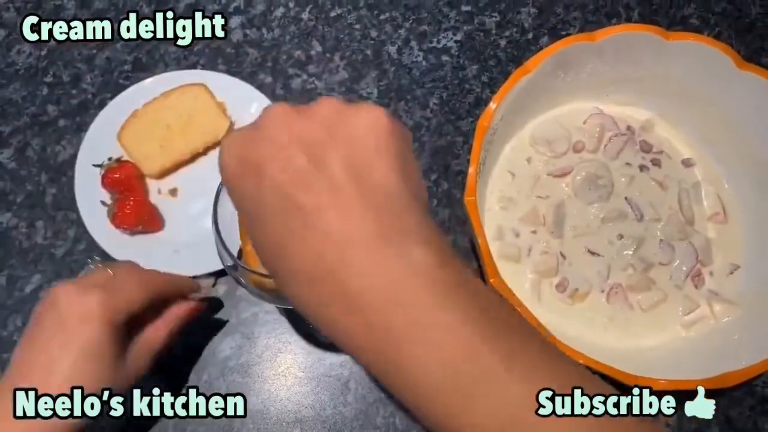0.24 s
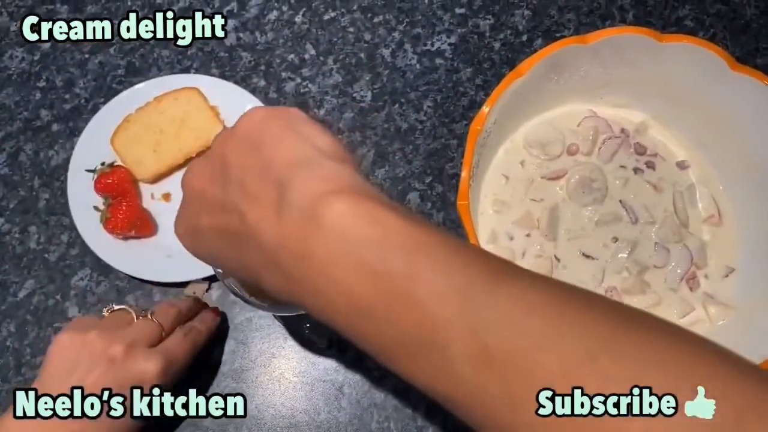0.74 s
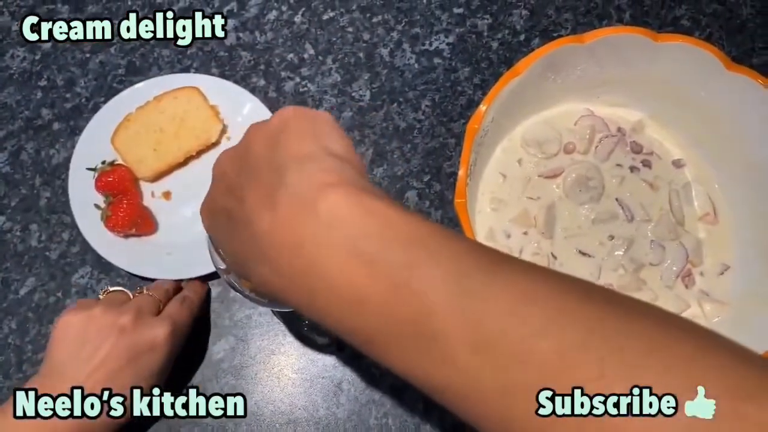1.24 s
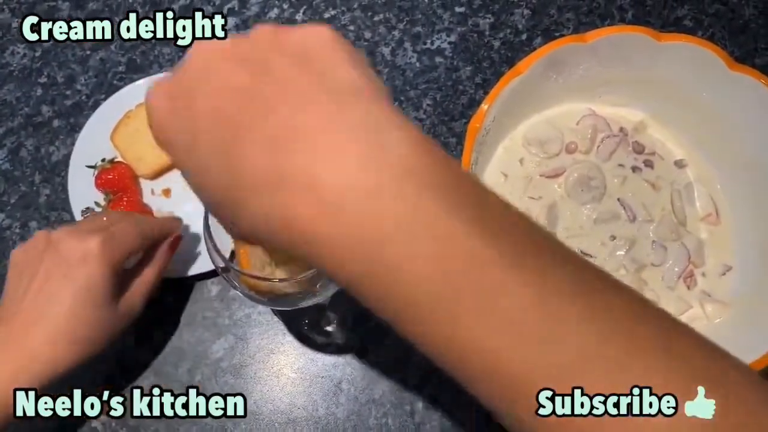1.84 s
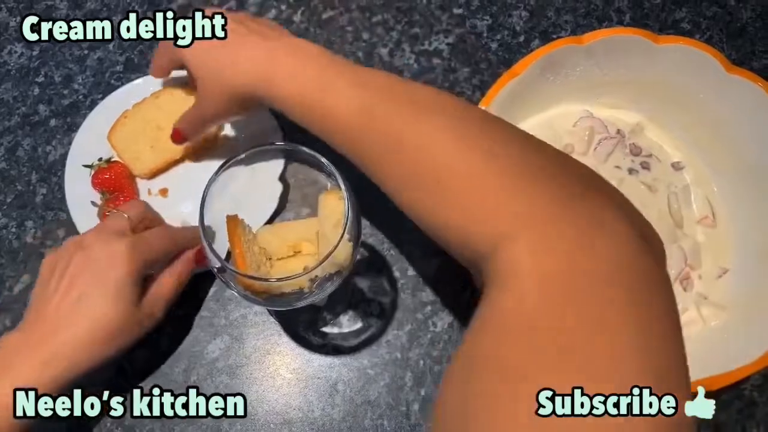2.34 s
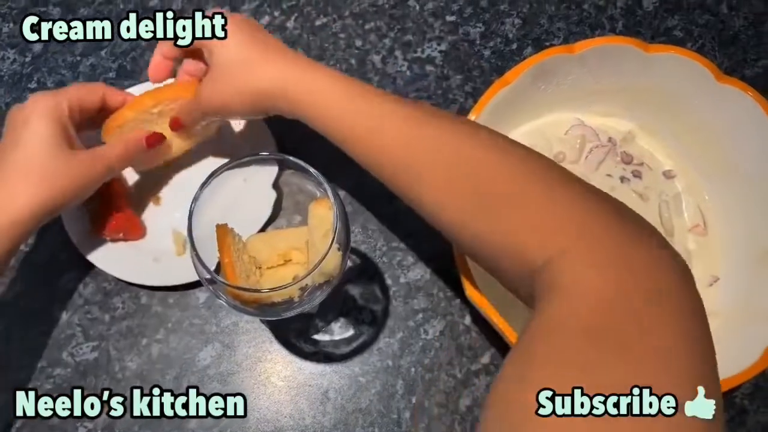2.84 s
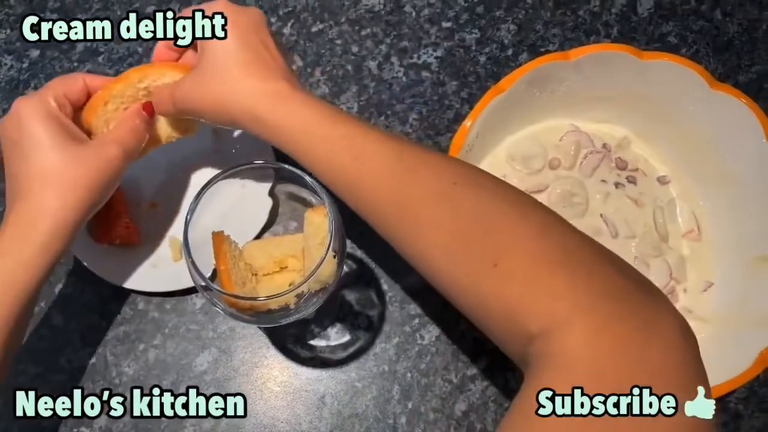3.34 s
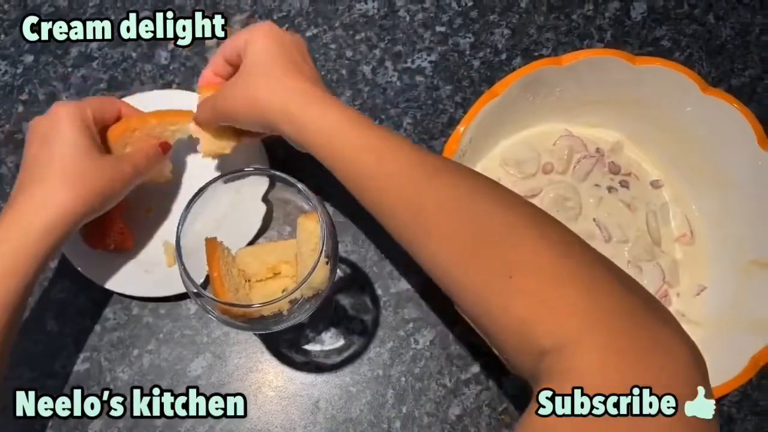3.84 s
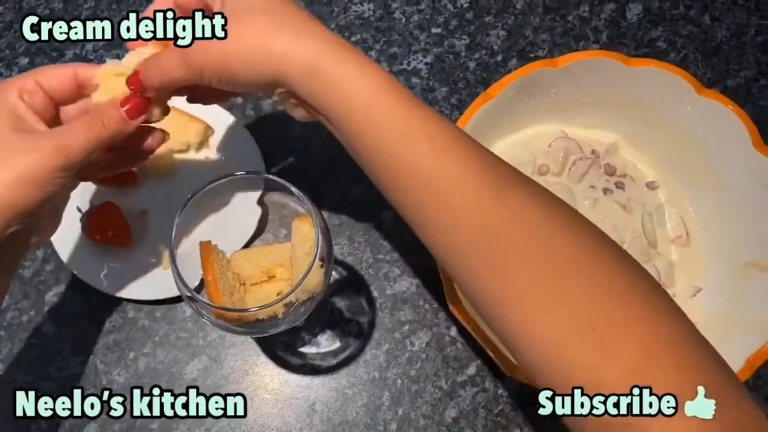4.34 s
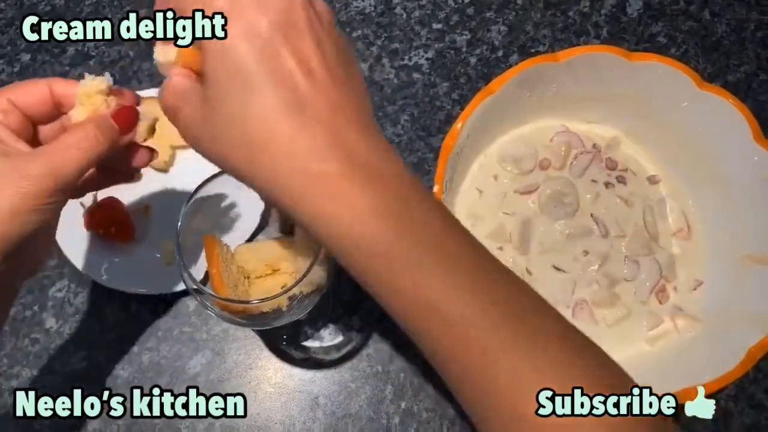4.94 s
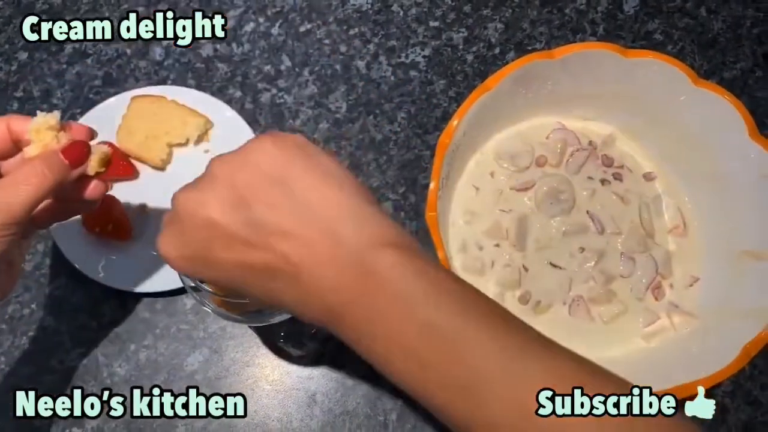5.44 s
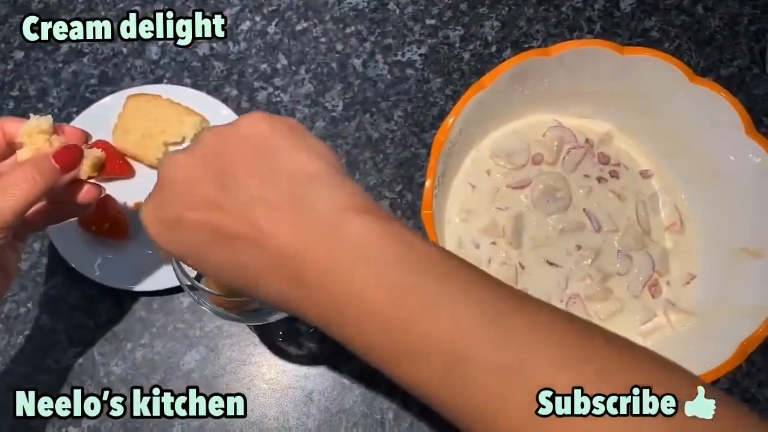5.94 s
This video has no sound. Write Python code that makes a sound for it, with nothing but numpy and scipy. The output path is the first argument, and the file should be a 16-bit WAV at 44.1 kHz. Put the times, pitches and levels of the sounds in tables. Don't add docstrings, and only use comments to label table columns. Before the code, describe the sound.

Quiet handling of a glass cup and plate in a small, lightly reverberant kitchen, miked closely. Low room noise swells and sinks throughout. Sparse clinks, crumb ticks and sleeve rustles lead to a woody knock, a pause of dry little ticks, then a strong combined knock and ringing clink. After that come a crisp glass tap, faint scratches and muffled low thumps.

```python
import sys
import numpy as np
from scipy import signal
from scipy.fft import rfft, irfft
from scipy.io import wavfile
from scipy.ndimage import uniform_filter1d

SR = 44100
rng = np.random.default_rng(int(sys.argv[2]) if len(sys.argv) > 2 else 0)


def gain_from_db(level_db):
    decades = np.asarray(level_db, float) / 20
    return 10 ** decades


def wrap_up_sound(samples):
    columns = np.atleast_2d(samples).T
    tamed = np.clip(columns, -1, 1)
    steps = np.round(tamed * 32767).astype(np.int16)
    wavfile.write(sys.argv[1], SR, steps)


N = 272532


def evened(x):
    return x / np.sqrt(np.mean(x ** 2) + 1e-20)


def read(points, hz):
    f, value = np.transpose(points)
    return np.interp(np.log(hz + 1), np.log(f + 1), value)


def add(mix, s, sound):
    part = mix[round(s * SR):][:len(sound)]
    part += sound[:len(part)]


def ring(hz, db, t60, rise=1e-4):
    t = np.arange(SR // 2) / SR
    decay = gain_from_db(db - 60 * t / t60)
    return decay * np.sin(2 * np.pi * hz * t) * (1 - np.exp(-t / rise))


def woken(modes, db, best_hz, loss_db, free=0.83, cycles=0.):
    total = 0
    for hz, mode_db, t60 in modes:
        off_db = abs(loss_db) * np.log2(hz / best_hz) ** 2
        total = total + ring(hz, db + mode_db - off_db, t60 * free, 1e-4 + cycles / hz)
    return total


def dish(modes, taps, slides):
    out = np.zeros(N)
    for s, *touch in taps:
        add(out, s, woken(modes, *touch, cycles=7))
    for s, length, *touch in slides:
        grit = rng.standard_normal(SR // 4)[:round(length * SR)] ** 3
        force = grit * np.hanning(len(grit)) ** .5 / np.linalg.norm(grit)
        add(out, s, signal.fftconvolve(force, woken(modes, *touch)))
    return out


def diffuse(frames, likeness, size):
    hz = np.fft.rfftfreq(size, 1 / SR)
    a, b, c, d = rng.standard_normal((frames, len(hz), 4)).T
    same = np.clip(read(likeness, hz), -1, 1)[:, None]
    first, other = a + 1j * b, c + 1j * d
    return hz[:, None], np.array([first, same * first + np.sqrt(1 - same ** 2) * other])


def air():
    # f/Hz, density/dB per Hz
    colour_points = [(20, -54), (36, -9), (63, -3.5), (120, -9), (301, -16.5), (439, -21.5), (624, -24),
                     (1370, -31), (1740, -33.5), (5430, -41), (7500, -44.5), (11000, -46.5), (14000, -47),
                     (16200, -59.5)]
    # t/s, swell/dB
    stir = [(0, 6.5), (.24, 1.5), (.5, 9.5), (.74, 5.5), (.88, 3.5), (1.3, 3.5), (1.95, -1.5), (2.4, 11),
            (2.6, 2.5), (2.72, 2.5), (3.2, -2.5), (3.5, 2), (3.85, 14), (4.12, 15.5), (4.25, -2.5),
            (4.65, 4), (4.95, -1.5), (5.7, 3)]
    # f/Hz, width/octaves, share of the swell
    stir_ranges = [(85, .7, 1.12), (350, 0.58, 0.82), (1120, 0.58, 0.25)]
    # f/Hz, width/Hz, level/dB
    hums = [(50.8, 7.6, -55), (108.8, 4, -66.5)]
    # f/Hz, likeness
    far_likeness = [(60, .998), (110, .95), (200, .78), (380, .3), (700, -.5), (1300, -.1), (3000, .1),
                    (5000, .6), (6300, .96), (15000, .96)]
    frames = N // 256 + 5
    hz, z = diffuse(frames, far_likeness, size=1024)
    s, stir_db = np.transpose(stir)
    stir_now = np.interp(np.arange(frames) * 256 / SR, s, stir_db)
    swell_db = 0
    for f, octaves, share in stir_ranges:
        swell_db = swell_db + np.exp(-(np.log2((hz + 1) / f) / octaves) ** 2) * share * stir_now
    patches = rng.standard_normal((frames, 513)).T
    patches = evened(uniform_filter1d(uniform_filter1d(patches, 6, 0), 10, 1))
    colour = gain_from_db(read(colour_points, hz))
    colour = colour * gain_from_db(-56) / np.sqrt(np.mean(colour[2:] ** 2))
    z = z * colour * gain_from_db(swell_db + 2.0 * patches)
    out = 17.4 * signal.istft(z, nperseg=1024, noverlap=768)[1][:, :N] / 513
    for f, width, db in hums:
        r = np.exp(-np.pi * width / SR)
        drive = rng.standard_normal((N + SR, 2)) @ [1, 1j]
        slow = signal.lfilter([1], np.convolve([1, -r], [1, -r]), drive)[SR:]
        carrier = np.exp(2j * np.pi * f * np.arange(N) / SR)
        out = out + gain_from_db(db) * evened((slow * carrier).real)
    return out


def glass():
    # f/Hz, level/dB, t60/s
    modes = [(1154, 0, .45), (2845, 0, .09), (2903, -5, .25), (5389, 0, .12), (5402, -16, .3),
             (8355, -5, .11), (8380, -20, .28), (11600, -22, .12), (12250, -18, .15)]
    # t/s, level/dB, best woken f/Hz, loss/dB per octave squared, share of free ring time
    taps = [
        (.001, -49, 5600, 11, 1.1),
        (.012, -62, 2900, 30, 1.7),
        (.03, -61, 1154, 30, .9),
        (.686, -67, 1154, 30, 1),
        (3.943, -48, 1154, 30, 1),
        (3.944, -51, 5400, 34, 1),
        (5.025, -45.5, 4800, 6, .55),
        (5.03, -52, 2900, 40, .5),
        (5.06, -54, 5400, 20, .9),
        (5.49, -69, 1154, 20, .25),
    ]
    # t/s, length/s, level/dB, best woken f/Hz, loss/dB per octave squared
    slides = [(.001, .03, -64, 1154, 30), (.59, .08, -71, 2900, 30), (.686, .04, -70, 5400, 21),
              (3.875, .04, -68, 6000, 12), (5.27, .1, -63, 5600, 16), (5.38, .09, -65, 6000, 12),
              (5.46, .07, -61, 3900, 5), (5.69, .04, -73, 6000, 12), (5.99, .05, -71, 6000, 12)]
    return dish(modes, taps, slides)


def kitchen(x, gap=0.0016):
    # f/Hz, t60/s
    band_t60 = [(60, 0.9), (200, 0.37), (500, 0.25), (1500, 0.45), (4000, 0.23), (10000, 0.066)]
    # f/Hz, likeness
    near_likeness = [(60, .999), (350, 0.97), (700, 0.45), (2500, 0.83), (5000, 0.54), (6300, 0.53),
                     (15000, 0.91)]
    hz, z = diffuse(320, near_likeness, size=256)
    t = np.arange(320) * 64 / SR
    tail = signal.istft(z * gain_from_db(-60 * t / read(band_t60, hz)), nperseg=256, noverlap=192)[1]
    tail = tail * (1 - np.exp(-(np.arange(tail.shape[1]) / SR / gap) ** 2))
    return signal.fftconvolve(x[None], tail / np.linalg.norm(tail[0]), axes=1)[:, :N]


def counter():
    # f/Hz, level/dB, t60/s
    modes = [(81, 3.5, 0.3), (106, -0.5, 0.24), (227, 1, 0.11), (271, 1, 0.058), (330, -0.5, 0.072),
             (446, 0, .3), (703, -0.5, 0.072), (1116, 5, 0.016), (2132, -12, 0.15), (2822, -7, 0.015)]
    # t/s, level/dB, best woken f/Hz, loss/dB per octave squared, time until muffled/s
    blows = [(.035, -39, 107, 30, .3), (.685, -53, 690, 30, .3), (.7486, -36, 950, 12, .3),
             (2.2791, -37, 73, 30, .3), (2.2805, -17, 880, 20, .008), (2.742, -51, 220, 30, .05),
             (3.884, -30, 200, 25, .025), (3.945, -23, 95, 40, .06), (3.945, -28, 270, 60, .03),
             (3.9415, -13.5, 446, 60, .027), (3.941, -15, 1120, 25, .3), (3.94, -28, 2600, 30, .3),
             (3.984, -25, 130, 25, .016), (5.026, -45, 220, 30, .3), (5.448, -37, 150, 8, .08),
             (5.449, -40, 300, 15, .02), (5.901, -25, 290, 80, .012), (5.916, -27, 130, 20, .012),
             (5.945, -35, 200, 40, .015)]
    # t/s, level/dB, top f/Hz, t60/s
    clatters = [(0.033, -49.5, 250, 0.18), (.685, -56, 540, 0.081), (.7486, -42, 1420, 0.13),
                (2.27, -32.5, 640, 0.26), (2.279, -42, 1700, 0.12), (2.742, -66.5, 1040, 0.15),
                (3.883, -57, 398, .054), (3.941, -24, 1102, 0.21), (2.269, -46.5, 1460, 0.13),
                (3.941, -33, 2250, .15), (5.028, -50.5, 1300, 0.038), (5.447, -43, 680, .15),
                (5.898, -55, 850, 0.069), (5.918, -46, 300, .1), (5.45, -42, 270, 0.31)]
    muffled_t60 = .02
    out, t = np.zeros(N), np.arange(SR // 2) / SR
    for s, db, top_hz, fade in clatters:
        band = signal.butter(3, [90, top_hz], "band", fs=SR, output="sos")
        clatter = evened(signal.sosfilt(band, rng.standard_normal(len(t))))
        add(out, s, gain_from_db(db - 60 * t / fade) * clatter * (1 - np.exp(-t / 0.0017)))
    for s, db, best_hz, loss_db, held in blows:
        muffle = gain_from_db(-60 * np.maximum(t - held, 0) / muffled_t60)
        add(out, s, muffle * woken(modes, db, best_hz, loss_db, cycles=1.6))
    return out


def skin():
    # t/s of firmest contact, level/dB, swell/s, fade/s
    strokes = [(.21, -86, .03, 0.037), (.35, -78, .07, 0.034), (1.94, -82, .06, 0.037),
               (2.081, -69.5, 0.12, 0.13), (2.17, -82, 0.088, 0.032), (2.38, -73.5, 0.076, 0.069),
               (2.57, -80.5, 0.058, 0.061), (3.0, -87, 0.066, 0.12), (3.13, -87, .05, 0.11),
               (3.705, -69, 0.019, 0.051), (3.78, -77, 0.023, 0.086), (3.884, -75, .008, .02),
               (3.939, -65.5, 0.012, 0.0422), (4.44, -87, .09, 0.14), (5.027, -61.5, 0.0072, 0.022),
               (5.065, -76, 0.0066, 0.05), (5.47, -81, 0.019, .04)]
    # f/Hz, density/dB per Hz
    colour = [(600, -7), (1500, -9.5), (4000, -1.5), (7500, -4), (11000, -3), (15000, 6.5), (16200, -64)]
    t, level = np.arange(N) / SR, np.zeros(N)
    for s, db, swell, fade in strokes:
        level += gain_from_db(db) * np.exp(-((t - s) / np.where(t < s, swell, fade)) ** 2)
    roughness = evened(uniform_filter1d(rng.standard_normal(N), 150))
    grains = rng.standard_normal(N) * gain_from_db(0.45 * roughness)
    hiss = irfft(rfft(grains) * gain_from_db(read(colour, np.fft.rfftfreq(N, 1 / SR))), N)
    return gain_from_db(7.5) * level * evened(hiss)


def sleeves():
    # t/s, level/dB, f/Hz, half length/s
    rustles = [(0.349, -62, 350, 0.065), (.48, -66, 452, 0.052), (0.856, -61.5, 330, 0.074),
               (0.998, -74.5, 1160, 0.12), (1.252, -64.5, 350, 0.032), (1.769, -71, 930, 0.046),
               (2.779, -72, 1120, 0.034), (3.15, -79.5, 1350, 0.033), (3.519, -66, 350, 0.11),
               (4.549, -74, 1080, 0.076), (4.768, -75, 1830, 0.046), (5.7, -55, 122.5, 0.079)]
    out, t = np.zeros(N), np.arange(-SR // 4, SR // 4) / SR
    for s, db, hz, half in rustles:
        band = signal.butter(2, [hz / 1.3, hz * 1.3], "band", fs=SR, output="sos")
        rustle = evened(signal.sosfilt(band, rng.standard_normal(len(t))))
        add(out, s - .25, gain_from_db(db) * np.exp(-(t / half) ** 2) * rustle)
    return out


def plate():
    # f/Hz, level/dB, t60/s
    modes = [(2315, -7, .27), (2347, -11, .2), (3330, -17, .12), (3604, -8, .2), (3611.5, -8, .2),
             (5112, 1, .07), (5140, -15, .25), (5348, -2, .075), (5365, -20, .2), (6880, -10, .12),
             (8812, -24, .12), (9281, -22, .1), (10950, -21, .1), (12400, -25, .12)]
    # t/s, level/dB, best woken f/Hz, loss/dB per octave squared, share of free ring time
    taps = [
        (.7487, -38.5, 5000, 1.8, .95),
        (.79, -54, 5200, 20, 1),
        (.835, -58, 3600, 60, .5),
        (1.469, -66, 2300, 30, .6),
        (2.268, -62, 4800, 5, .7),
        (3.9405, -39, 2300, 34, .8),
        (3.944, -48, 3400, 50, 1.6),
        (3.947, -40, 9300, 40, 1),
    ]
    # t/s, length/s, level/dB, best woken f/Hz, loss/dB per octave squared
    slides = [
        (.285, .085, -54, 5100, 16),
        (1.2, .08, -72, 5000, 11),
        (2.285, .04, -62, 3600, 40),
        (2.345, .08, -54, 4200, 3),
        (3.73, .07, -68, 5000, 11),
    ]
    return dish(modes, taps, slides)


def ticks():
    # t/s, peak level/dB, f/Hz, width/Hz, room share/dB
    tick_table = [(0.751, -40.5, 13000, 4970, 12.5), (1.734, -49.5, 4800, 900, -2),
                  (2.126, -41, 1480, 1600, 4), (3.285, -36.5, 5200, 1990, -5),
                  (3.2862, -40, 2540, 1820, -7), (3.285, -39.5, 8650, 3000, 1),
                  (3.377, -58.5, 5400, 800, -1), (3.4887, -57, 10100, 2020, -8),
                  (3.734, -34.5, 14200, 3010, -17), (3.786, -49, 10650, 2990, 1),
                  (3.887, -52, 2530, 2970, -10.5), (3.939, -49, 5060, 2955, -8),
                  (3.94, -44.5, 10000, 4000, 13), (4.761, -61.5, 1190, 925, 6.5),
                  (5.023, -42, 9000, 9000, 0), (5.065, -41, 11800, 3000, -2), (5.463, -54, 10440, 4000, 7),
                  (5.898, -54, 12000, 4000, -6)]
    near, far, t = np.zeros(N), np.zeros(N), np.arange(1000) / SR
    for s, db, hz, width, room_db in tick_table:
        u = np.pi * width * t
        burst = gain_from_db(db) * np.e * u * np.exp(-u) * np.sin(2 * np.pi * hz * t)
        add(near, s, burst)
        add(far, s, burst * gain_from_db(room_db))
    return near, far


def scene():
    room = air()
    dishes = gain_from_db(4.5) * (glass() + plate())
    knocks, rub = counter() + sleeves(), skin()
    near, far = ticks()
    echoing = gain_from_db(-12) * dishes + gain_from_db(-11) * knocks
    wet = kitchen(echoing + far + gain_from_db(-9.5) * rub)
    return dishes * gain_from_db([[.6], [-.6]]) + knocks + near + rub + wet + room


def thinned(left, right):
    hz, _, z = signal.stft([left + right, left - right], SR, nperseg=1024, noverlap=768)
    hz = hz[:, None]
    power = uniform_filter1d(uniform_filter1d(abs(z) ** 2, 14, 1), 4, 2)
    masked = (power < power[::-1] * gain_from_db(-14)) & (hz > 5800)
    least_db = np.select([hz > 15550, hz > 13800, hz > 12500], [-96., -108., -113.], -200)
    kept = ~masked & (power > gain_from_db(2 * least_db))
    total, apart = signal.istft(z * kept, nperseg=1024, noverlap=768)[1][:, :N] / 2
    return np.array([total + apart, total - apart])


def low_pass(x):
    return signal.sosfilt(signal.butter(12, 16150, fs=SR, output="sos"), x)


def record(dry):
    # f/Hz, lead/half turns
    lead = [(250, 0), (900, .1), (3000, .2), (5600, .3), (6400, .62), (7000, .93), (8000, 1.06),
            (8350, 1.36), (9800, 1.93), (11000, 2.07), (12700, 2.93), (14000, 3.05), (15500, 3.5)]
    turn = np.exp(.5j * np.pi * read(lead, np.fft.rfftfreq(N, 1 / SR)))
    ports = irfft(rfft(dry) * [turn, 1 / turn], N)
    mix = thinned(*ports)
    return low_pass(mix)


dry = scene()
out = record(dry)
wrap_up_sound(out)
```